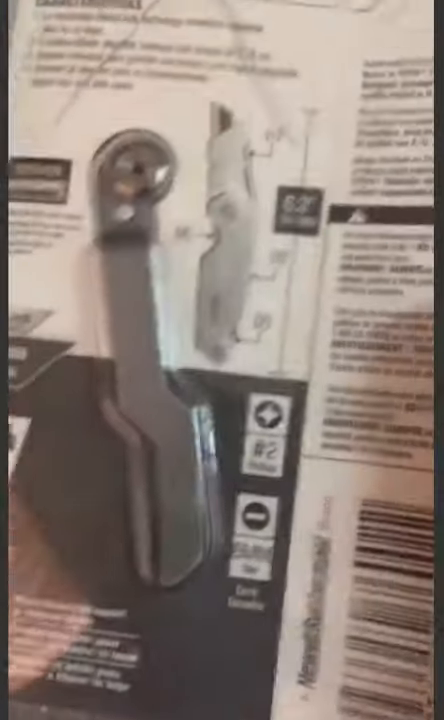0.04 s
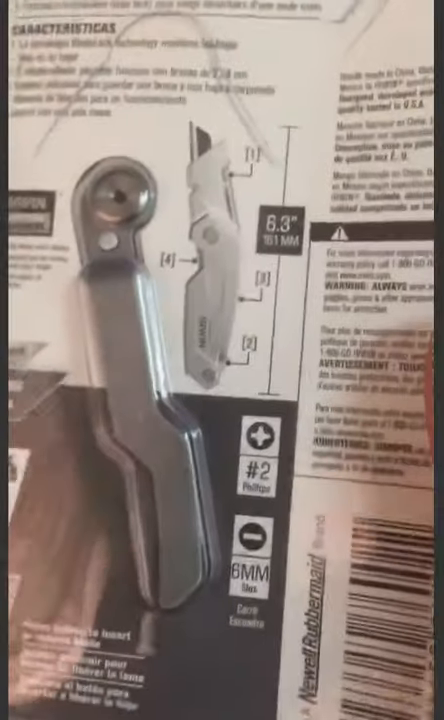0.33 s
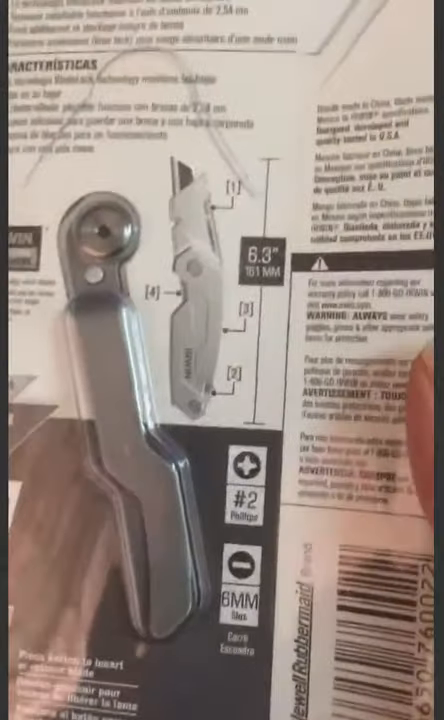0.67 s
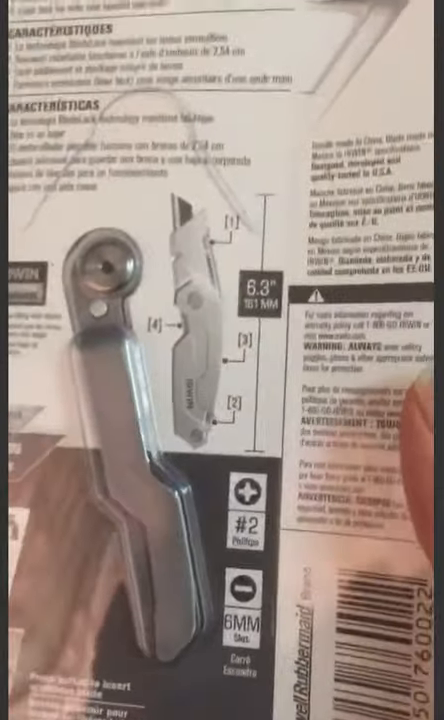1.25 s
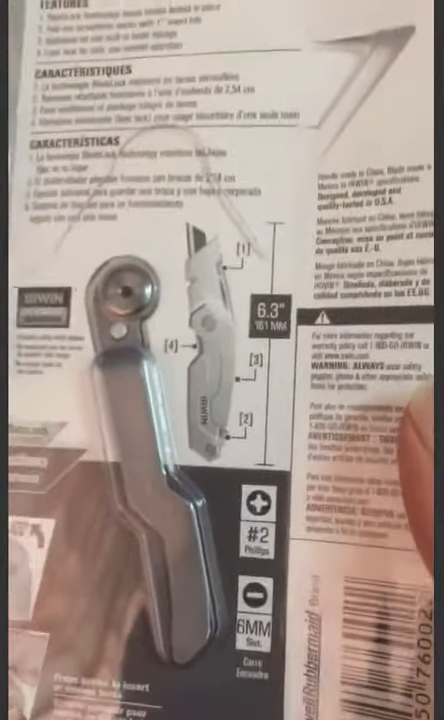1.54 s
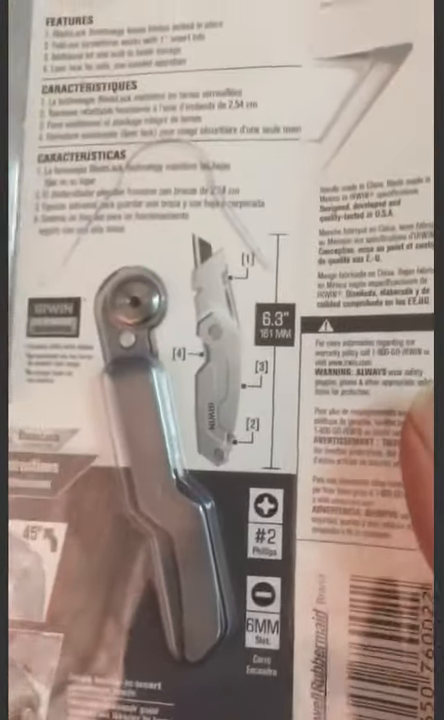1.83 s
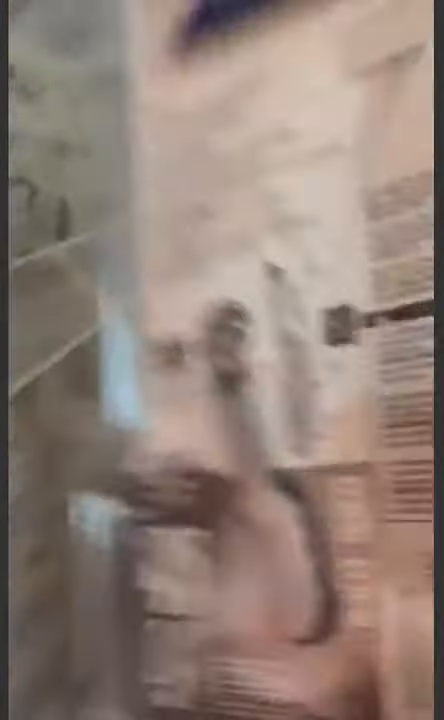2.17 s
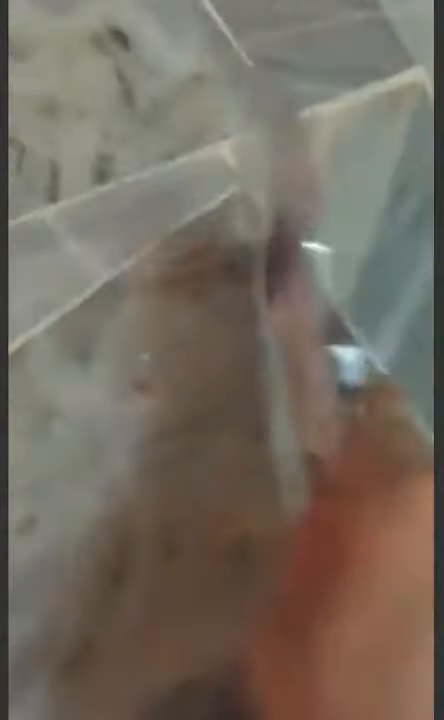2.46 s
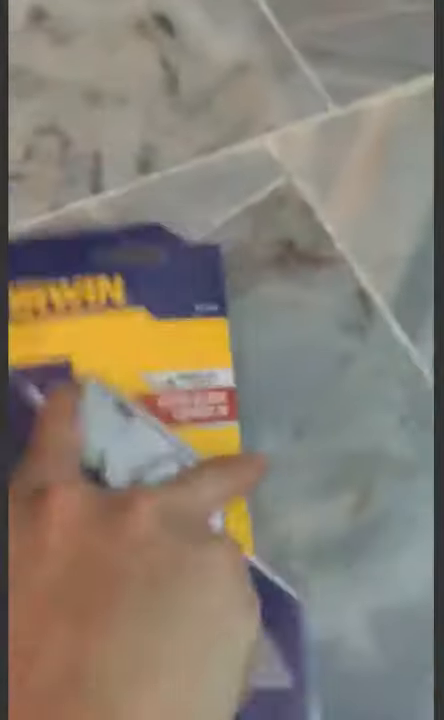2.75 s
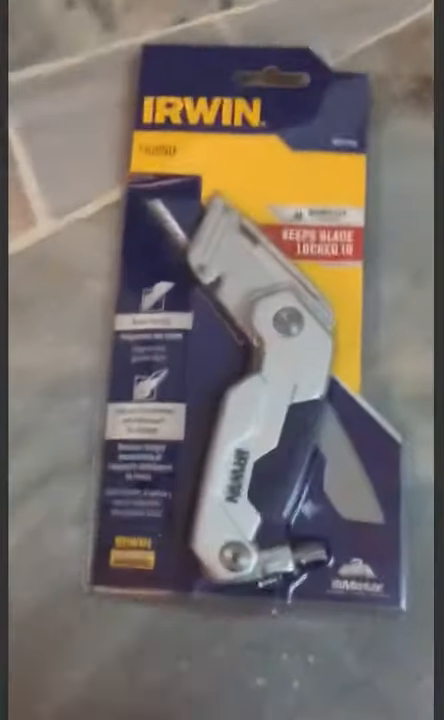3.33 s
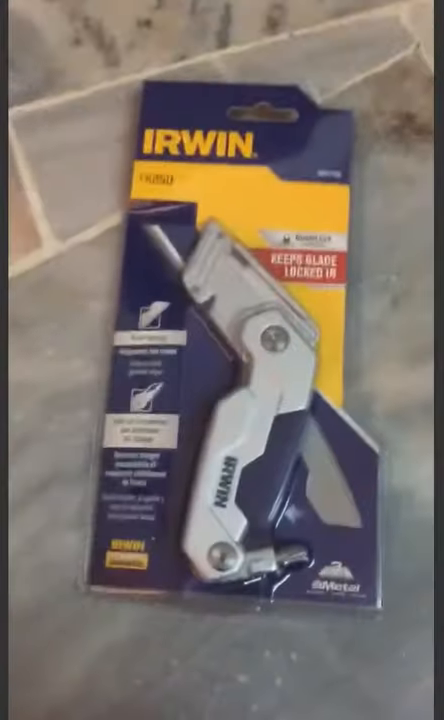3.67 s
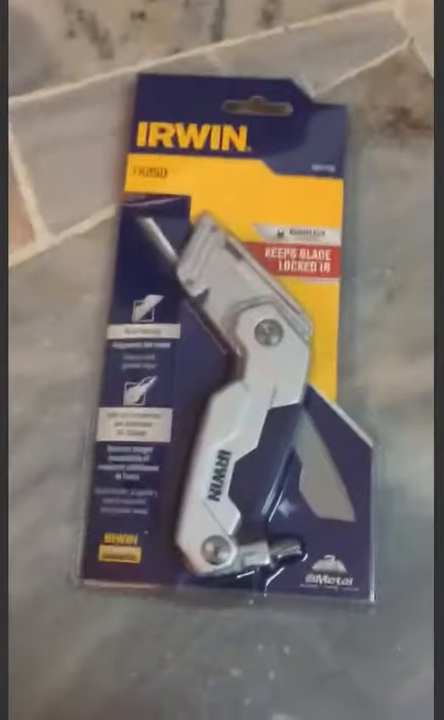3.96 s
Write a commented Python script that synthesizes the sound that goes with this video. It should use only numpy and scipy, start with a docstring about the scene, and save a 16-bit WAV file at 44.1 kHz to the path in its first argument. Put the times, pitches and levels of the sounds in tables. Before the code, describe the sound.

Close up in a quiet, faintly rumbling room, a blister pack holding a knife is set on a tiled floor. After soft bumps and rubbing come a sharp clack, a short scrape, a louder rattling slap and a thin click.

```python
"""A packaged knife laid on tile

A knife in a card and plastic blister pack is turned over and laid on a tiled floor in a quiet room.
One edge clacks down, the pack slides under the fingers, then slaps flat and chatters to rest.
Each impact excites damped modes of card, plastic and knife; sliding and finger rubs are stick-slip
noise. Around it are a low room rumble, a few dull bumps and two thin, echoing clicks."""
import sys
import numpy as np
from scipy import signal
from scipy.fft import rfft, irfft
from scipy.io import wavfile

SR = 44100
rng = np.random.default_rng(int(sys.argv[2]) if len(sys.argv) > 2 else 0)


def dump_mix(stems):
    """Bounce the given channels to the path in sys.argv[1] as a 16-bit WAV at rate SR."""
    frames = np.atleast_2d(stems).T  # one column per channel
    limited = np.clip(frames, -1, 1)  # hard clip at full scale
    pcm = np.round(limited * 32767).astype(np.int16)
    wavfile.write(sys.argv[1], SR, pcm)


N = 176400
T = np.arange(N) / SR

# Spectrum of the room's rumble: frequency_hz, relative_db
RUMBLE_SPECTRUM = [(20, -19), (40, -11.5), (64, 3.5), (85, -5.5), (125, 1), (160, -1), (200, 3), (260, -9),
                   (340, -15.5), (470, -23), (580, -17), (670, -8.5), (800, -20), (950, -20.5), (1150, -14),
                   (1400, -26), (1700, -27.5), (2100, -33), (2900, -34), (4800, -42), (6000, -41),
                   (8000, -45), (12000, -49.5)]
# Course of the rumble's level: time_s, level_db
RUMBLE_ENVELOPE = [(0, -46.5), (.8, -47.5), (1.5, -46), (2.2, -46.5), (2.7, -42.5), (3.2, -51.5),
                   (3.55, -46), (3.82, -52.5), (3.97, -47.5)]
# Reverberation time (negative in the deep bass, which grows until the tail ends): frequency_hz, t60_s
REVERB_TIMES = [(150, -0.07), (700, .5), (1050, 1.3), (1450, 1.48), (2300, 0.85), (4300, 0.53),
                (11000, 0.6)]
# Colour of the reverberation: frequency_hz, gain_db
REVERB_GAINS = [(150, -6.5), (450, -11.5), (800, -7.5), (1100, -7), (1500, -5.5), (3000, 3.5), (4500, -3.5),
                (6000, -5.5), (11000, -1.5)]
# Dull bumps: start_s, level_db
BUMP_EVENTS = [(.845, -38), (1.196, -33), (1.255, -35), (1.302, -44.5)]
# Modes of a bump: frequency_hz, level_db, t60_s
BUMP_BODY_MODES = [(235, -6, 0.051), (274.4, -0.5, 0.11), (367, -11, 0.054), (560, -15, 0.044),
                   (837, -17, 0.11), (1084, -18, 0.039), (1290, -24, 0.038)]
# Thin clicks: start_s, level_db, pitch_hz, t60_s
CLICK_EVENTS = [(1.394, -56.5, 4850, 0.085), (3.5257, -35, 6760, 0.021)]
# Spectrum of a click's noise: frequency_hz, relative_db
CLICK_SPECTRUM = [(1500, -35), (2600, -5), (3200, -7), (4100, 2), (4900, -6), (5700, 2), (7700, -11.5),
                  (8800, -9), (10000, -10.5), (12000, -19)]
# Fingers squeezing and rubbing the blister: centre_s, sigma_s, level_db
RUB_EVENTS = [(0.437, 0.033, -56.5), (1.535, 0.073, -60.5), (1.831, 0.046, -65), (2.26, 0.0084, -51.5),
              (2.826, 0.0093, -42), (3.39, 0.061, -63), (3.52, 0.018, -58.5), (3.965, .045, -63.5)]
# Spectrum of skin friction on plastic: frequency_hz, relative_db
RUB_SPECTRUM = [(300, 2), (1200, 9.5), (10000, -5.5), (12000, -12)]
# Resonances of the hollow blister: frequency_hz, bandwidth_hz, gain_db
CAVITY_RESONANCES = [(1730, 510, 2.5), (2850, 1100, -2), (3410, 88, 4.5), (4490, 180, -1.5),
                     (5450, 900, 2.5), (7400, 1600, -12.5), (9170, 3000, -11)]
# Level of the slide, following the pressure on the tile: time_s, level_db
SLIDE_ENVELOPE = [(2.46, -58.5), (2.481, -51.5), (2.52, -40.5), (2.58, -50.5), (2.625, -46.5), (2.685, -46),
                  (2.72, -50.5), (2.76, -49.5), (2.805, -56), (2.85, -52.5), (2.885, -49), (2.908, -32.5),
                  (2.92, -32), (2.95, -34.5), (2.985, -45.5), (3.03, -54)]
# Spectrum of the pack's friction on tile: frequency_hz, relative_db
SLIDE_SPECTRUM = [(20, -35.5), (60, -25.5), (170, -6), (420, -6), (1000, 2), (1500, 2), (2300, -1),
                  (3500, -3), (5000, -6.5), (7000, -10), (11000, -11.5), (12500, -31)]
# The pack touching tile or fingers: start_s, card_db, crack_db, thud_db
IMPACT_EVENTS = [(2.197, -34, -46, -68), (2.253, -62.5, -57.5, -82), (2.474, -14, 0, -36),
                 (2.4753, -19, -10, -26.5), (2.479, -11, -15.5, -27), (2.4838, -24.5, -22.5, -22),
                 (2.6895, -19.5, -32, -54.5), (2.779, -37, -39.5, -65.5), (2.8175, -33, -38, -66),
                 (2.8704, -37.5, -27, -61.5), (2.8875, -19.5, -24.5, -52.5), (2.902, -16.5, -26, -48.5),
                 (2.9062, -10, -22.5, -38), (2.9254, -7.5, -12, -32.5), (2.9281, 4, -2.5, -30),
                 (2.932, 7.5, -3.5, -30.5), (2.9496, -10, -21.5, -46), (2.962, -6, -29.5, -44.5),
                 (2.978, -29, -39.5, -62), (2.994, -20, -45, -60), (3.6806, -34, -78, -78),
                 (3.84, -33.5, -56, -61)]
# Bending modes of the card: frequency_hz, level_db, t60_s
CARD_MODES = [(724, -22, 0.053), (997, -21, .034), (1099, -12, 0.026), (1254, -11.5, 0.016),
              (1340, -15, .018), (1436, -6.5, 0.022), (1523, -16.5, 0.013), (1690, -13.5, .02),
              (1890, -23, .016), (2090, -16.5, 0.02), (2380, -14.5, 0.014)]
# Distinct modes of the blister: frequency_hz, level_db, t60_s
BLISTER_MODES = [(2670, -15.5, .011), (3710, -9, 0.0084), (4380, -14, 0.0082), (5440, -16, 0.0087),
                 (6340, -12.5, .007), (7300, -19.5, 0.0036), (9400, -16.5, .003)]
# Modes of the thud of the knife's weight: frequency_hz, level_db, t60_s
THUD_MODES = [(167, -5.5, 0.095), (290, -2, .045), (380, -3.5, .03)]
# The plastic's many fine modes, merged into a spectrum: frequency_hz, relative_db
CRACK_SPECTRUM = [(150, -25), (450, -14.5), (900, -3.5), (2500, 0.5), (3400, 4.5), (4500, -1), (5100, -5),
                  (7000, -7.5), (10000, -12), (12000, -23.5)]


def from_db(db):
    """Amplitude ratio of a level in decibels."""
    return 10 ** (np.asarray(db) / 20)


def unit_rms(x):
    """Normalisation to unit mean power."""
    return x / np.sqrt(np.mean(x ** 2) + 1e-20)


def at_hz(table, hz):
    """Interpolation on a logarithmic frequency axis."""
    table_hz, values = np.transpose(table)
    return np.interp(np.log(hz + 1e-9), np.log(table_hz), values)


def coloured(x, spectrum):
    """Spectral shaping of a signal, at unit power."""
    gain = from_db(at_hz(spectrum, np.fft.rfftfreq(N, 1 / SR)))
    return unit_rms(irfft(rfft(x) * gain, N))


def noise(spectrum):
    """Stationary Gaussian noise of a given spectrum."""
    return coloured(rng.standard_normal(N), spectrum)


def wander(turns_per_s):
    """Random modulation: straight lines between Gaussian values."""
    return np.interp(T * turns_per_s, np.arange(N), rng.standard_normal(N))


def butterworth(x, hz, kind):
    """A maximally flat filter with second-order slopes."""
    return signal.sosfilt(signal.butter(2, hz, kind, fs=SR, output="sos"), x)


def resonance(x, hz, bandwidth_hz):
    """Forced response of a single damped resonator."""
    return signal.lfilter(*signal.iirpeak(hz, hz / bandwidth_hz, fs=SR), x)


def decay(t60_s):
    """Exponential damping by 60 dB in t60_s, one second long."""
    return np.exp(-np.minimum(np.log(1000) * T[:SR] / t60_s, 40))


def burst(steady, t60_s):
    """A transient: a random stretch of noise under exponential damping."""
    start = rng.integers(N - SR)
    return steady[start:start + SR] * decay(t60_s)


def ringing(modes, delay_at_1khz_s=0, scatter_db=2):
    """Impulse response as a sum of damped modes; with dispersion, the low ones arrive later."""
    hz, db, t60_s = np.transpose(modes)[:, :, None]
    age_s = np.maximum(T[:SR // 10] - delay_at_1khz_s * np.sqrt(1000 / hz), 0)
    excited_db = db + scatter_db * rng.standard_normal(hz.shape)
    fade_db = np.minimum(60 * age_s / t60_s, 300)
    return np.sum(from_db(excited_db - fade_db) * np.sin(2 * np.pi * hz * age_s), axis=0)


def friction(spectrum, slips_per_s=4900, spread_db=2):
    """Stick-slip friction: a dense random train of tiny impulses of uneven size."""
    slips = (rng.random(N) < slips_per_s / SR) * rng.choice([-1, 1], N)
    sizes = from_db(spread_db * np.minimum(rng.exponential(1, N), 4))
    return coloured(slips * sizes, spectrum)


def add(out, start_s, sound):
    """Superposition of a sound from a given time."""
    start = int(start_s * SR)
    out[start:start + len(sound)] += sound[:N - start]


def room_rumble(swell_below_hz=140, swell_db=4):
    """Background noise whose deepest part swells and sinks by amplitude modulation."""
    steady = noise(RUMBLE_SPECTRUM)
    deep = signal.sosfiltfilt(signal.butter(2, swell_below_hz, fs=SR, output="sos"), steady)
    swelling = steady - deep + deep * from_db(swell_db * wander(turns_per_s=12))
    return swelling * from_db(np.interp(T, *np.transpose(RUMBLE_ENVELOPE)))


def room_response(build_up_s=0.011):
    """A diffuse field: each band of noise has its own reverberation time."""
    tail, edges_hz = 0, np.geomspace(80, 14000, 15)
    for low, high in zip(edges_hz, edges_hz[1:]):
        hz = np.sqrt(low * high)
        band = butterworth(rng.standard_normal(SR), [low, high], "band")
        envelope = decay(at_hz(REVERB_TIMES, hz)) * (1 - np.exp(-T[:SR] / build_up_s))
        tail += band * envelope / np.linalg.norm(envelope) * from_db(at_hz(REVERB_GAINS, hz))
    return tail


def early_reflections(delay_s=0.003):
    """Scattering from floor, hand and body, as an impulse response of unit energy."""
    scatter = rng.standard_normal(SR) * decay(t60_s=0.15) * (T[:SR] > delay_s)
    return scatter / np.linalg.norm(scatter)


def dull_bumps():
    """Free vibration of low, quickly damped modes, heard as soft knocks."""
    out, knock = np.zeros(N), ringing(BUMP_BODY_MODES)
    for start_s, level_db in BUMP_EVENTS:
        add(out, start_s, from_db(level_db) * knock)
    return out


def thin_clicks(ring_db=7):
    """Bright snaps of noise, each given a pitch by the resonance it excites."""
    out, bright = np.zeros(N), noise(CLICK_SPECTRUM)
    for start_s, level_db, pitch_hz, t60_s in CLICK_EVENTS:
        snap = burst(bright, t60_s)
        ring = from_db(ring_db) * resonance(snap, pitch_hz, bandwidth_hz=1190)
        add(out, start_s, from_db(level_db) * (snap + ring))
    return out


def finger_rubs():
    """Skin friction drives the resonances of the hollow blister in soft Gaussian swells."""
    slips = friction(RUB_SPECTRUM)
    shell = sum(from_db(db) * resonance(slips, hz, width) for hz, width, db in CAVITY_RESONANCES)
    swells = sum(from_db(level_db) * np.exp(-0.5 * ((T - centre_s) / sigma_s) ** 2)
                 for centre_s, sigma_s, level_db in RUB_EVENTS)
    return unit_rms(shell) * swells


def pack_slide(snag_db=3):
    """Sliding friction: the pack's edge catches and lets go on the tile until it lies flat."""
    level_db = np.interp(T, *np.transpose(SLIDE_ENVELOPE), left=-np.inf, right=-np.inf)
    return friction(SLIDE_SPECTRUM) * from_db(level_db + snag_db * wander(turns_per_s=70))


def pack_impacts(radiation_low_hz=637, card_high_hz=3250, thud_low_hz=110, fine_modes_db=-7):
    """Impact excitation: each contact knocks the card, cracks the blister and jolts the knife inside."""
    out, fine_modes = np.zeros(N), noise(CRACK_SPECTRUM)
    for start_s, card_db, crack_db, thud_db in IMPACT_EVENTS:
        card = ringing(CARD_MODES, delay_at_1khz_s=0.0006)  # low bending waves travel slower
        card = butterworth(card, radiation_low_hz, "high")  # too small to radiate bass
        card = butterworth(card, card_high_hz, "low")  # too soft for much treble
        shell = from_db(card_db) * card + from_db(crack_db) * ringing(BLISTER_MODES)
        crack = from_db(crack_db + fine_modes_db) * burst(fine_modes, t60_s=0.013)
        thud = from_db(thud_db) * butterworth(ringing(THUD_MODES), thud_low_hz, "high")
        for part in (butterworth(shell, radiation_low_hz, "high"), crack, thud):
            add(out, start_s, part)
    return out


def scene():
    """Direct and reflected sound add; the close pack excites the room less than bumps and clicks do."""
    pack, bumps, clicks = pack_impacts() + pack_slide(), dull_bumps(), thin_clicks()
    to_room = from_db(-18) * pack + from_db(1.5) * bumps + from_db(-2) * clicks
    to_near_surfaces = from_db(-13.5) * pack + from_db(-1.5) * clicks
    reverberation = signal.fftconvolve(to_room, room_response())[:N]
    reflections = signal.fftconvolve(to_near_surfaces, early_reflections())[:N]
    return (pack + bumps + clicks + reverberation + reflections + finger_rubs() + room_rumble())[None]


def record(dry):
    """Band limiting and soft saturation: deep bass and top treble are cut, the loudest peaks rounded."""
    low_hz, high_hz, ceiling = 45.5, 12000, 0.95
    x = butterworth(dry, low_hz, "high")
    rounded = x / (1 + (x / ceiling) ** 6) ** (1 / 6)
    return signal.sosfiltfilt(signal.ellip(10, 0.1, 60, high_hz, fs=SR, output="sos"), rounded)


dry = scene()
out = record(dry)
dump_mix(out)
```